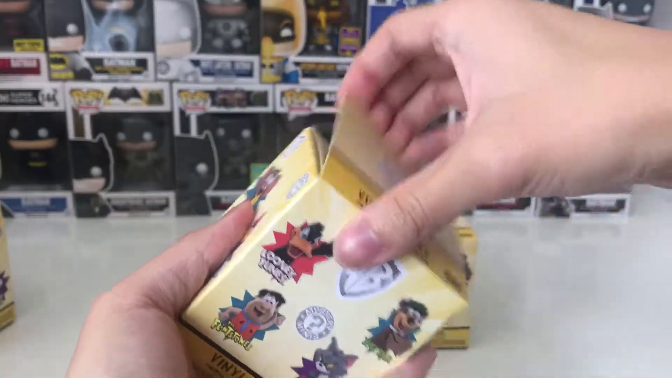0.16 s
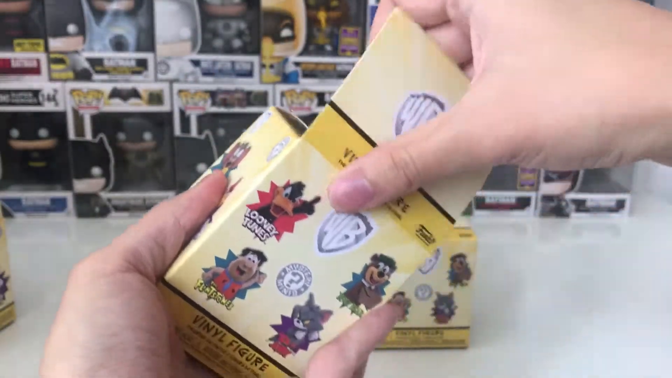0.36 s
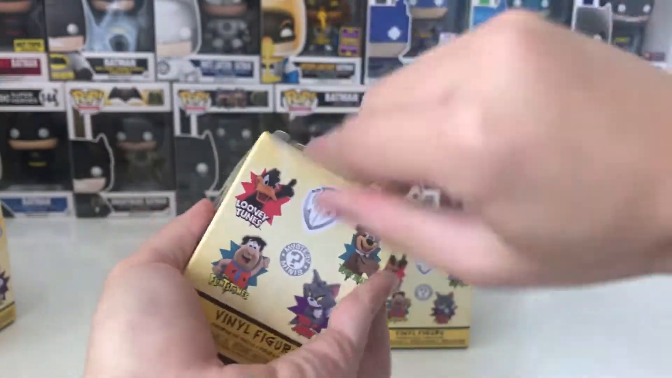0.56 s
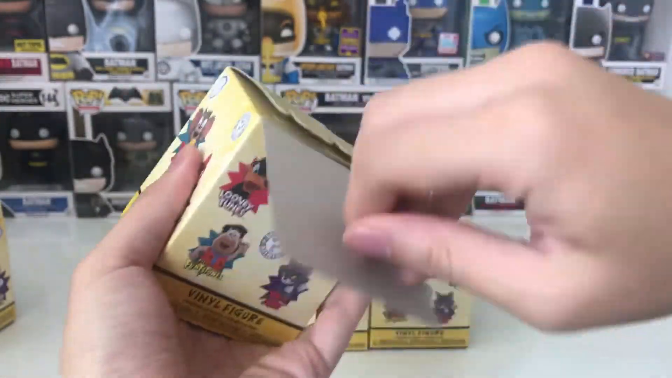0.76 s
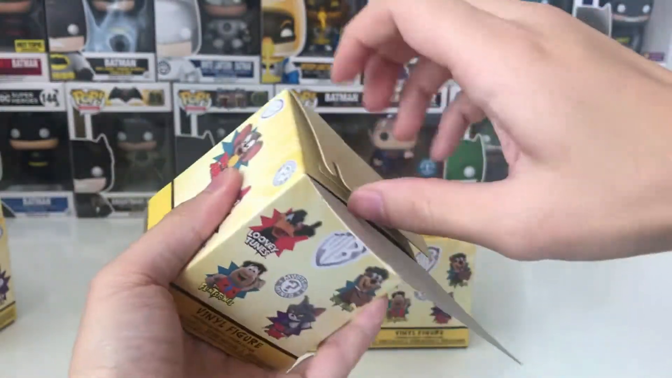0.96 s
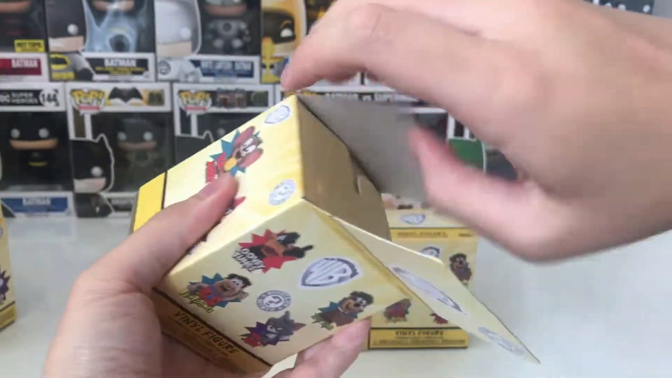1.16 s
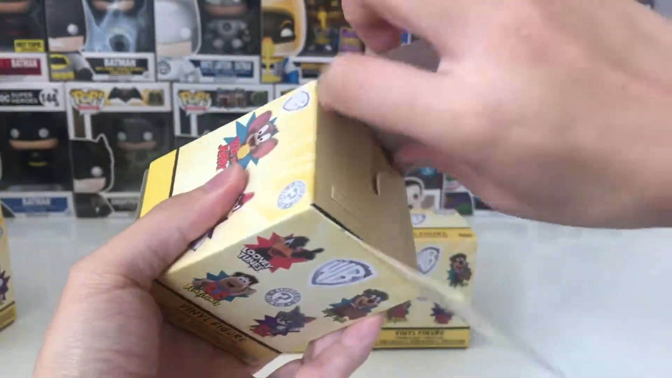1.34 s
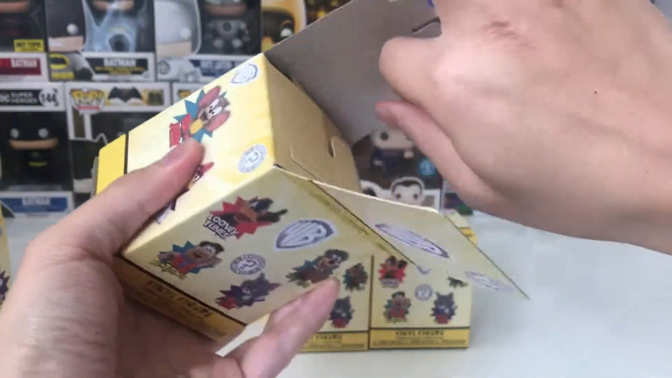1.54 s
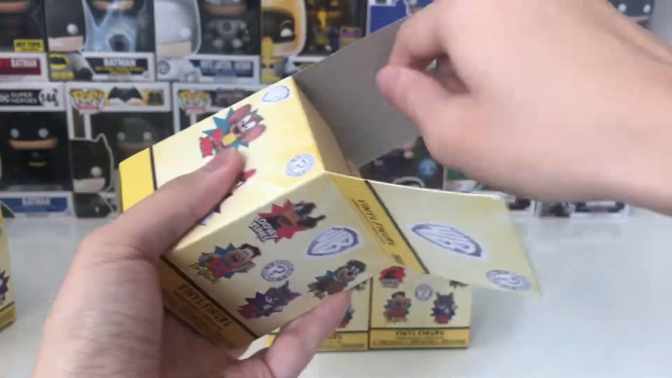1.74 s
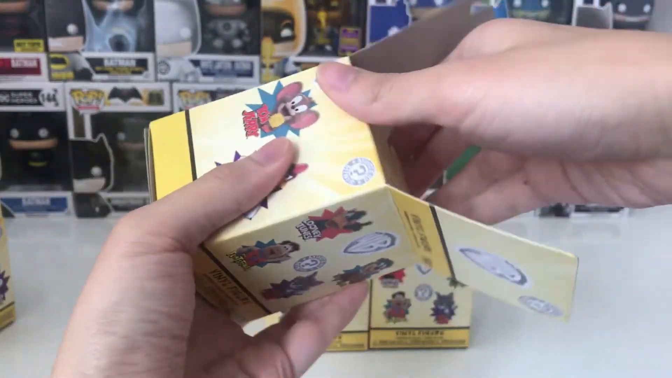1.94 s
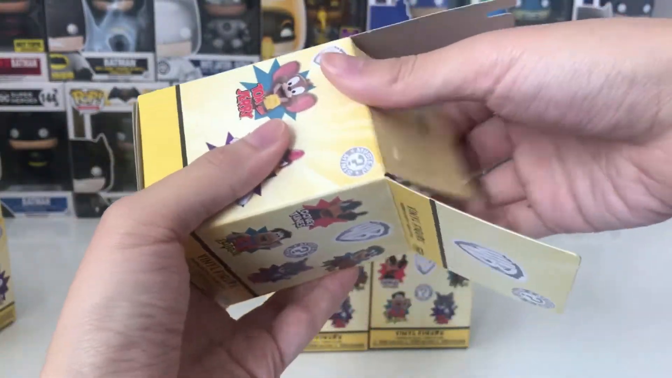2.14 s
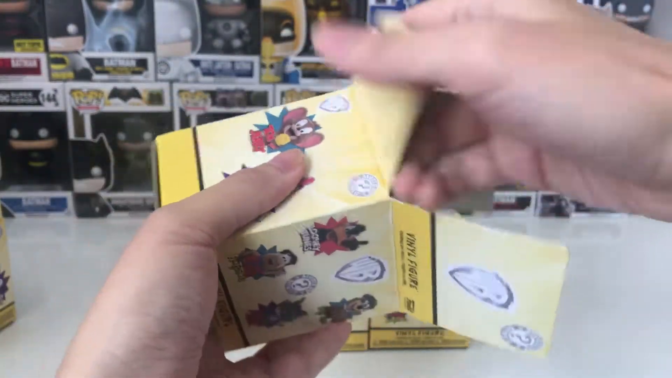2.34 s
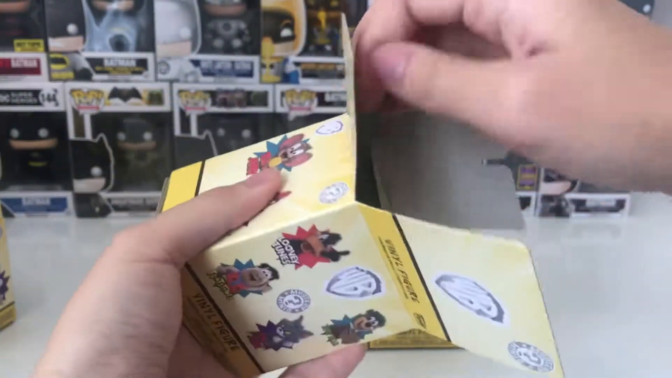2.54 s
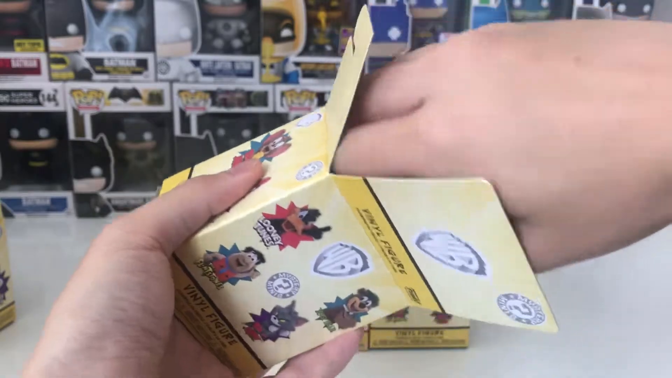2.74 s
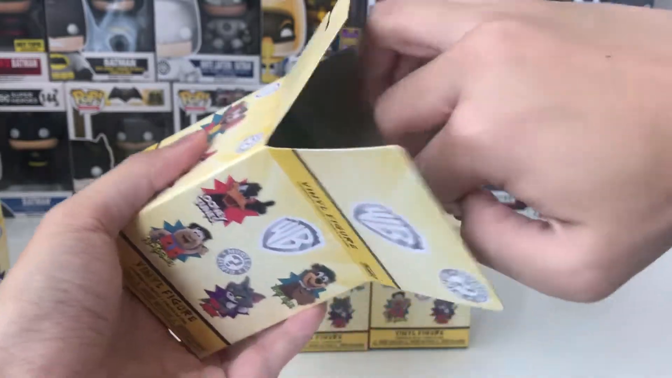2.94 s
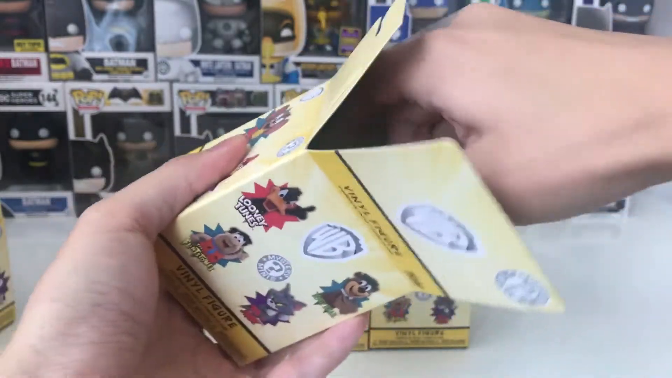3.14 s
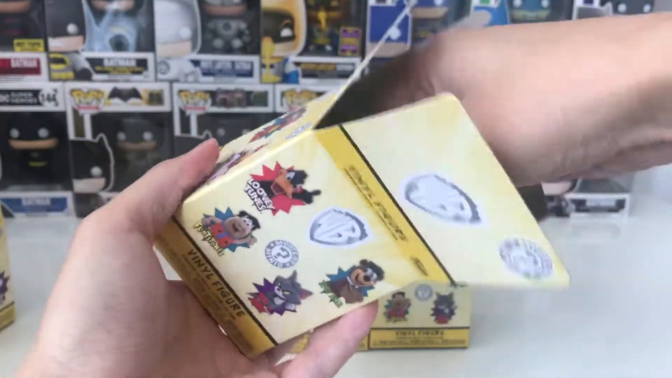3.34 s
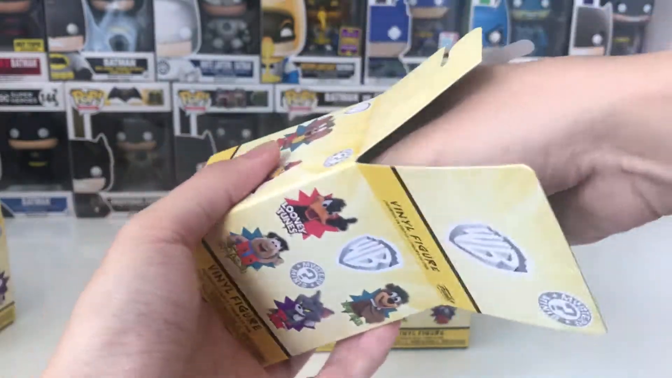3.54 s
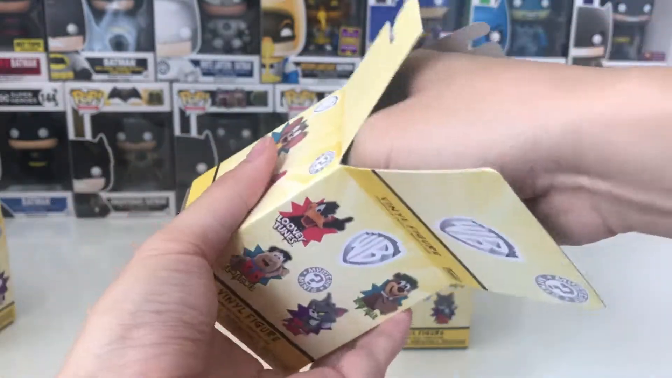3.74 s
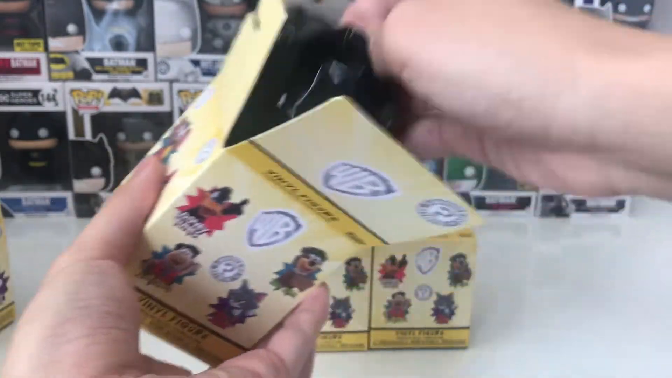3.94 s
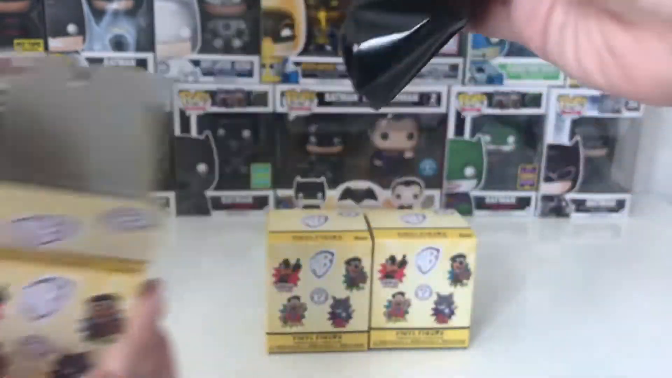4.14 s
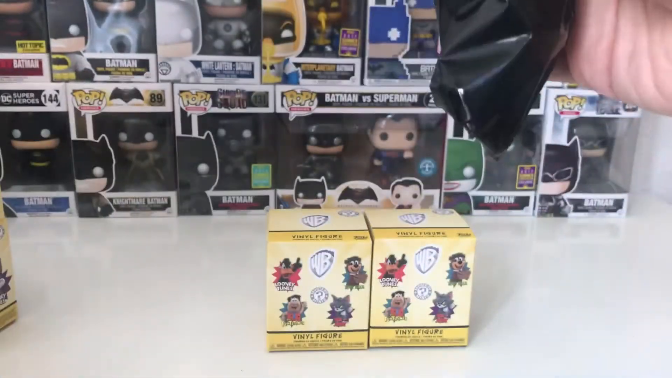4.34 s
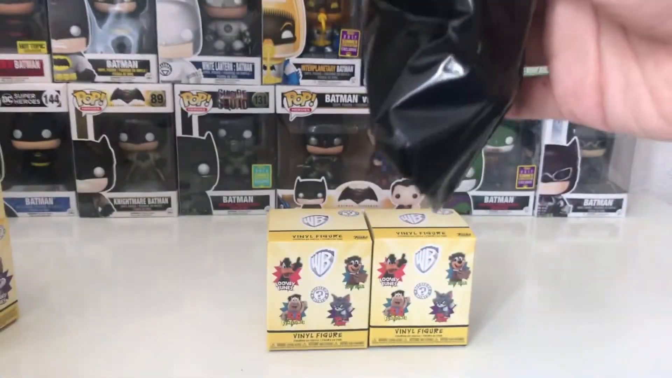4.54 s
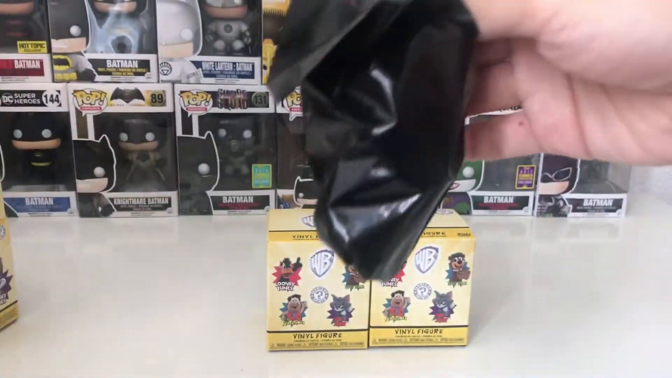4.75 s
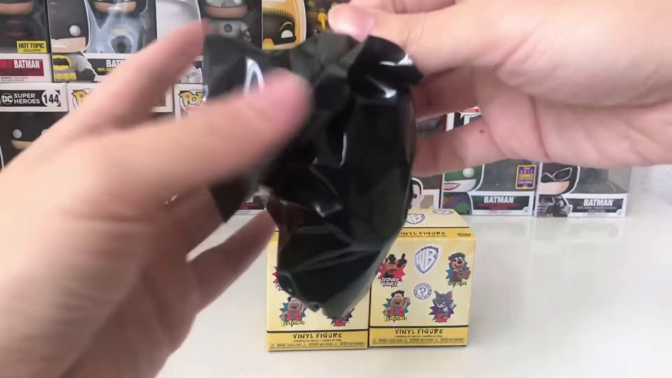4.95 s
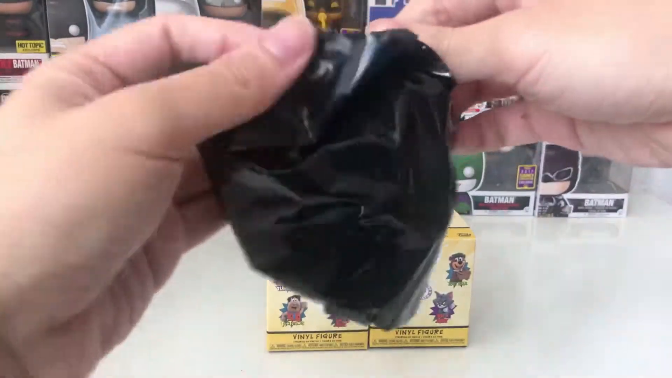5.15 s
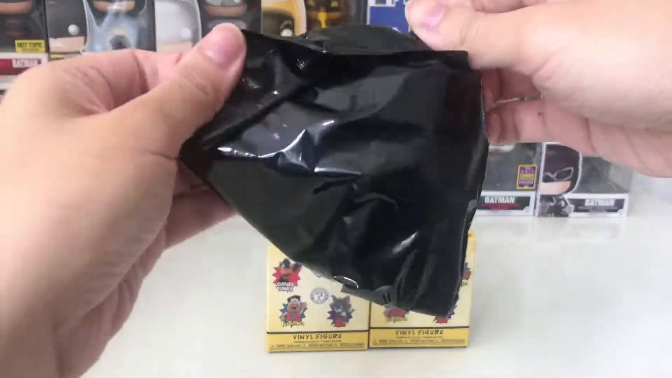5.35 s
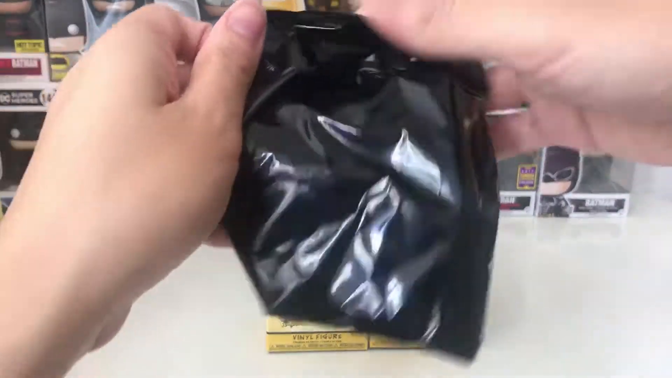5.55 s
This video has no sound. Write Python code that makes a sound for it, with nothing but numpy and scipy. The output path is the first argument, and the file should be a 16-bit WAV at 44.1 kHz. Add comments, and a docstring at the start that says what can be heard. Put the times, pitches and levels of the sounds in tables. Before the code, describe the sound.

In a quiet room with a faint hum, a small cardboard box cracks open at its glued lid. Flaps rasp and briefly squeak, and fingers slide over the card between light, hollow knocks. After a loud snap and a soft bump, a foil bag rustles and knocks its way out of the box, pauses, then crinkles steadily as it is handled. Everything is heard close to the microphone.

```python
"""A quiet, humming room, where two hands open a small cardboard box close to the microphone.
The glued lid snaps free; knocks crack at the edge, ring the panels and thud in the hollow of the box.
Fingers stick and slip on the card, and flaps scrape past each other with a pitched rasp and a squeak.
Then a foil bag comes out and crinkles in the hands: single creases pop over a shower of tiny ones."""
import sys
import numpy as np
from scipy import signal
from scipy.io import wavfile
from scipy.ndimage import uniform_filter1d

SR = 44100
rng = np.random.default_rng(int(sys.argv[2]) if len(sys.argv) > 2 else 0)


def put_to_file(sound):
    """Save the sound as 16-bit audio at rate SR, in the file named by the first command-line argument."""
    columns = np.atleast_2d(sound).T  # one column per channel
    safe = np.clip(columns, -1, 1)
    whole_steps = np.round(safe * 32767)
    wavfile.write(sys.argv[1], SR, whole_steps.astype(np.int16))


N = 251357
TIME = np.arange(N) / SR

# tone of friction on card: freq_hz, gain_db
CARD_HISS = [(700, -20.5), (1800, 1), (5500, 1), (9000, -4), (15500, -12.5)]


def gain_of(db):
    """Decibels to amplitude."""
    return 10 ** (np.asarray(db) / 20)


def unit_rms(x):
    """Scales to rms 1."""
    return x / np.sqrt(np.mean(x ** 2) + 1e-20)


def hit_level(x, db):
    """Gives a short sound the energy of 10 ms at the level db."""
    return gain_of(db) * x * np.sqrt(SR / 100 / np.sum(x ** 2))


def curve_at(points, hz):
    """Reads a curve on a log-frequency axis."""
    freqs, values = np.transpose(points)
    return np.interp(np.log(hz + 1), np.log(freqs + 1), values)


def add(mix, start_s, sound):
    """Mixes a sound in at start_s."""
    part = mix[round(start_s * SR):][:len(sound)]
    part += sound[:len(part)]


def colour(x, tone, hz=1000, focus_db=0, size=2048):
    """Minimum-phase EQ: the tone curve, less focus_db per octave either side of hz."""
    freqs = abs(np.fft.fftfreq(size, 1 / SR))
    octaves_off = abs(np.log2((freqs + 1) / hz))
    log_gain = np.log(gain_of(curve_at(tone, freqs) - focus_db * octaves_off))
    taps = np.fft.ifft(np.exp(np.conj(signal.hilbert(log_gain)))).real
    return signal.oaconvolve(x, taps[:size // 2])[:len(x)]


def resonate(x, hz, width_hz):
    """A steady or gliding resonance of gain 1."""
    carrier = np.exp(2j * np.pi * np.cumsum(hz * np.ones(len(x))) / SR)
    pole = np.exp(-np.pi * width_hz / SR)
    return 2 * (carrier * signal.lfilter([1 - pole], [1, -pole], x / carrier + 1e-18)).real


def burst(decay_s, sharpness=0, rise_s=1 / SR, size=4096):
    """A fast-dying run of fine slips; sharpness is the share of energy in the first jolt."""
    t = np.arange(size) / SR
    slipping = rng.choice([-1., 1.], size) * np.exp(-t / decay_s) * -np.expm1(-t / rise_s)
    jolt = np.sqrt(sharpness) * (t == 0)
    return jolt + np.sqrt(1 - sharpness) * slipping / np.linalg.norm(slipping)


def slips(per_s, spread_db):
    """A random train of tiny slips, mostly small, a few large."""
    strength = gain_of(spread_db * np.minimum(rng.exponential(1, N), 2))
    return unit_rms(strength * rng.choice([-1., 1.], N) * (rng.random(N) < per_s / SR))


def waver(depth_db, per_s):
    """A random factor around 1 that drifts per_s times a second."""
    return gain_of(depth_db * np.interp(TIME * per_s, np.arange(N), rng.standard_normal(N)))


def patchy(x, depth_db, size=7):
    """The contact wanders over the card, so patches of the spectrum swell and fade."""
    spectrum = signal.stft(x, nperseg=512)[2]
    patches = uniform_filter1d(rng.standard_normal(spectrum.shape), size, axis=0)
    patches = unit_rms(uniform_filter1d(patches, size, axis=1))
    return unit_rms(signal.istft(spectrum * gain_of(depth_db * patches))[1][:N])


def pressure(start_s, length_s, swell_share=0.17, release_db_per_s=278):
    """One stroke of the hand: it presses harder, holds and lets go."""
    t = TIME - start_s
    swell = np.clip(t / (swell_share * length_s), 0, 1)
    release_db = -release_db_per_s * np.maximum(t - length_s, 0)
    return swell * gain_of(np.maximum(release_db, -120))


def strokes(rows):
    """Overlapping strokes add in power; one envelope for each level column."""
    return np.sqrt(sum(np.outer(gain_of(levels_db), pressure(start_s, length_s)) ** 2
                       for start_s, length_s, *levels_db in rows))


def room_tone(hum_hz=50.5, hum_db=-57, air_db=-63, swell_s=0.14):
    """Faint room air and a wavering low hum that swells twice."""
    # tone of the air: freq_hz, gain_db
    air_tone = [(30, -2), (130, 0.5), (400, -5), (2200, -44.5), (15500, -50)]
    # swells of the hum: peak_s, level_db
    hum_swells = [(1.03, -50.5), (2.82, -49)]
    air = unit_rms(colour(rng.standard_normal(N), air_tone))
    drift = unit_rms(resonate(rng.standard_normal(N), hum_hz, width_hz=8))
    hum = unit_rms(np.sin(2 * np.pi * hum_hz * TIME) + drift / 4)
    swells = sum(gain_of(db) * np.exp(-((TIME - peak_s) / swell_s) ** 2) for peak_s, db in hum_swells)
    return gain_of(air_db) * air + (gain_of(hum_db) + swells) * hum


def panels(push, tuning, focus_db=0, width_hz=90):
    """The card panels ring, their modes scaled by tuning; focus_db favours the middle modes."""
    # panel modes before tuning: freq_hz, gain_db
    modes = [(570, -17.5), (695, 0.5), (915, 4), (1050, 3), (1240, -6.5), (1600, 0)]
    out = np.zeros(len(push))
    for hz, db in modes:
        ring = resonate(push, hz * tuning, width_hz)
        ring = resonate(ring, hz * tuning, hz * 1.6)  # a broad second pass trims the skirts
        out += gain_of(db - focus_db * abs(np.log2(hz / 1000))) * ring
    return out


def cavity(push):
    """The hollow low ring of the whole box and the air in it."""
    # low box modes: freq_hz, width_hz, gain_db
    modes = [(144.6, 154, -1.5), (292.6, 56, 1.5)]
    return sum(gain_of(db) * resonate(resonate(push, hz, width), hz, width) for hz, width, db in modes)


def knocks():
    """Each blow cracks at the edge, rings the panels at its own pitch and thuds inside the box."""
    # snaps and knocks on the card: start_s, crack_db, panel_db, thud_db, pitch_hz
    blows = [(0.1556, -30.5, -47, -52, 1050), (0.172, -19, -33, -74, 1220), (0.184, -20, -24, -45, 1140),
             (0.188, -29, -25.5, -35.5, 1020), (0.276, -45.5, -44, -39.5, 1030),
             (0.7719, -36, -33, -55, 1635), (0.818, -37.5, -32, -60, 1367), (1.205, -70, -45, -51.5, 830),
             (1.288, -55, -42.5, -41, 850), (1.459, -72, -44, -47, 580), (1.603, -55, -35.5, -39.5, 770),
             (1.884, -45, -42.5, -49, 794), (1.896, -45, -41.5, -56, 925), (1.938, -46.5, -44.5, -57, 860),
             (2.055, -54, -40.5, -68, 940), (2.159, -78, -40.5, -69, 553), (2.202, -49, -38.5, -43, 870),
             (2.378, -46.5, -38, -51, 980), (2.799, -47.5, -38.5, -42.5, 760),
             (2.896, -43.5, -47.5, -67, 870), (2.941, -19.5, -22, -29.5, 847),
             (2.953, -39, -28.5, -33, 1080), (3.382, -39.5, -32, -37, 706), (3.901, -30, -25.5, -35.5, 983),
             (3.912, -31, -29, -42, 1036), (3.968, -32, -37, -67, 1210), (3.985, -30, -30, -38, 1040),
             (4.031, -56, -31.5, -41, 923), (4.55, -45, -40.5, -35.5, 900)]
    # tone of a cracking edge: freq_hz, gain_db
    edge_tone = [(500, -6), (1800, 4.5), (2600, -6.5), (3600, -0.5), (4800, -12.5), (6000, -8), (9500, -11),
                 (15500, -9)]
    out = np.zeros(N)
    for start_s, crack_db, panel_db, thud_db, pitch_hz in blows:
        # near 1, glue breaks sharp and bright; near 0, a finger lands gradually
        brittle = 1 / (1 + gain_of(panel_db - crack_db))
        rise_s = 0.0014 * (1 - brittle) ** 2 + 1 / SR
        snap = burst(decay_s=0.0034, sharpness=brittle ** 2 / 2, rise_s=rise_s)
        crack = colour(snap, edge_tone, hz=2500 + 7000 * brittle, focus_db=9.5)
        ring = panels(burst(decay_s=0.0035, rise_s=rise_s), tuning=pitch_hz / 1000, focus_db=7)
        thud = cavity(burst(decay_s=0.0085, sharpness=0.5))
        knock = hit_level(crack, crack_db) + hit_level(ring, panel_db) + hit_level(thud, thud_db)
        add(out, start_s, knock)
    return out


def rubbing(hold_body_db=-68.5, hold_hiss_db=-66):
    """Stick and slip on the card: the contact hisses, the flexing panels and the air inside murmur."""
    # skin, bag or table sliding along the box: start_s, length_s, body_db, hiss_db
    rubs = [(0.18, 0.068, -65, -41), (0.21, 0.084, -48, -45.5), (0.26, 0.32, -58.5, -53),
            (0.548, 0.039, -53, -44.5), (0.93, 0.062, -50, -60.5), (1.19, 0.11, -61, -47),
            (1.342, 0.065, -44, -44.5), (1.44, 0.079, -63, -48), (1.59, 0.07, -52, -54.5),
            (1.71, 0.015, -55, -57.5), (1.78, 0.1, -84.5, -54), (2.02, 0.12, -57, -55.5),
            (2.18, 0.084, -58, -51), (2.26, 0.19, -47.5, -48), (2.52, 0.038, -49, -51.5),
            (2.55, 1, -56.5, -52.5), (2.94, 0.067, -39, -43.5), (3.165, 0.034, -45.5, -46),
            (3.36, 0.39, -51.5, -52), (3.77, 0.23, -45.5, -44), (3.955, 0.041, -48, -36.5),
            (4.02, 0.757, -67, -61.5), (4.508, 0.032, -47, -41.5), (4.55, 0.04, -41.5, -65),
            (4.82, 0.048, -60.5, -50.5)]
    holding = gain_of([[hold_body_db], [hold_hiss_db]])  # fingers that merely hold the card
    body_gain, hiss_gain = np.hypot(strokes(rubs), holding)
    friction = slips(per_s=480, spread_db=6) * waver(depth_db=2.5, per_s=60)
    bend = waver(depth_db=1.4, per_s=18)
    body = unit_rms(unit_rms(panels(friction, tuning=bend)) + gain_of(-8) * unit_rms(cavity(friction)))
    firm_hiss = patchy(colour(slips(per_s=6000, spread_db=4.5), CARD_HISS), depth_db=2.2, size=14)
    # a light touch leaves the panels still and hisses higher
    light_hiss = unit_rms(signal.lfilter([1, -1], [1, 0.4], firm_hiss))
    lightness = (hiss_gain / (hiss_gain + body_gain)) ** 2
    hiss = unit_rms((1 - lightness) * firm_hiss + lightness * light_hiss)
    return body_gain * body + hiss_gain * hiss * waver(depth_db=3, per_s=130)


def flap_scrape(ends_db=-20, drop_octaves=0.25, width_hz=700):
    """Fibres catch on a cut edge and sound the gap between flaps; each drag rises and falls in pitch."""
    # one flap dragged over another: start_s, length_s, level_db, pitch_hz
    drags = [(0.614, 0.1, -34.5, 1005), (0.75, 0.015, -23.5, 990), (0.783, 0.091, -43.5, 1060),
             (0.834, 0.12, -39.5, 1036)]
    # gap resonances at 1, 2, 3... times the pitch: gain_db
    gap_modes = [-1, 6, 7, 1, -18, -3.5, -28, -11.5]
    fibres = slips(per_s=5000, spread_db=3)
    gains, pitches = [], []
    for start_s, length_s, level_db, pitch_hz in drags:
        progress = np.clip((TIME - start_s) / length_s, -1, 2)
        slowness = (2 * progress - 1) ** 2  # 0 in mid drag, 1 at its ends
        gains.append(gain_of(level_db + ends_db * slowness))
        pitches.append(pitch_hz / 2 ** (drop_octaves * np.minimum(slowness, 2)))
    pitch = np.average(pitches, axis=0, weights=gains) * waver(depth_db=0.6, per_s=110)
    gap = sum(gain_of(db) * resonate(resonate(fibres, k * pitch, width_hz), k * pitch, width_hz)
              for k, db in enumerate(gap_modes, 1))
    rasp = unit_rms(gap) + gain_of(-5.5) * unit_rms(colour(fibres, CARD_HISS))
    return sum(gains) * patchy(rasp, depth_db=2) * waver(depth_db=1.5, per_s=220)


def tab_squeak(swell_s=0.0044):
    """The tab sticks and slips in quick, uneven jerks as it clears the edge."""
    # the squeak: peak_s, level_db, pitch_hz
    chirp = (0.759, -28.5, 3600)
    peak_s, level_db, pitch_hz = chirp
    cycles = np.cumsum(pitch_hz * waver(depth_db=0.6, per_s=1500)) / SR
    jerks = sum(np.cos(2 * np.pi * k * cycles) / np.sqrt(k) for k in range(1, 5))
    return hit_level(jerks * np.exp(-((TIME - peak_s) / swell_s) ** 2), level_db)


def crease(hz, focus_db):
    """One facet of foil snaps through with a tick, settles with a weaker one and rings very briefly."""
    # tone of a foil tick: freq_hz, gain_db
    foil_tone = [(400, 1), (1100, 6), (2300, 0), (3400, 3), (4800, 0.5), (7500, 0), (15500, -3.5)]
    snap = burst(decay_s=0.0011, sharpness=0.3, size=1024)
    settle = np.roll(snap, round(SR * rng.uniform(0.001, 0.004))) / 4
    tick = colour(snap + settle, foil_tone, hz, focus_db)
    return unit_rms(tick) + unit_rms(resonate(tick, hz, hz / 2)) / 2


def foil_bag(facet_count=20):
    """Large creases pop over a shower of small ones, denser under a harder grip, as the sheet flexes."""
    # fingers grip and bend the bag: start_s, length_s, level_db
    grips = [(3.47, 0.25, -46), (3.8, 0.25, -40), (4.96, 0.83, -43), (5.15, 0.016, -36.5),
             (5.235, 0.083, -36.5)]
    # large creases popping over: start_s, level_db, pitch_hz
    pops = [(3.2066, -37, 6860), (3.2138, -37.5, 6240), (3.2854, -33.5, 3660), (3.404, -36, 7850),
            (3.41, -37.5, 7900), (3.485, -35, 7160), (3.512, -35, 1700), (3.533, -39, 3760),
            (3.5693, -31, 1560), (3.604, -35, 9250), (3.6391, -36, 5500), (3.6589, -37, 3440),
            (3.669, -35, 5050), (3.7092, -37.5, 3900), (3.8019, -35, 6650), (3.832, -44, 6960),
            (4.0008, -27.5, 4940), (4.02, -29, 5700), (4.1188, -40.5, 4180), (4.148, -35.5, 2360),
            (4.1511, -30.5, 5400), (4.2813, -39, 8300), (4.648, -36, 3200), (4.8269, -46, 1900),
            (4.961, -49.5, 14100), (4.9905, -34, 3200), (5.047, -27, 11700), (5.0824, -41, 2520),
            (5.11, -32, 2820), (5.1444, -34, 3950), (5.1671, -37.5, 2880), (5.1794, -29.5, 3330),
            (5.2021, -55, 3000), (5.2199, -31.5, 8800), (5.2483, -32, 3450), (5.276, -32.5, 3400),
            (5.3157, -41, 8900), (5.3415, -33.5, 3180), (5.3627, -36.5, 2800), (5.3991, -40, 2830),
            (5.4206, -29, 3240), (5.449, -37, 5300), (5.457, -34, 8500), (5.492, -27.5, 3260),
            (5.581, -36, 9500), (5.6583, -33.5, 5500), (5.6711, -34.5, 6740)]
    grip = strokes(grips)[0]
    ticks_per_s = 170 + 34000 * grip
    ticks = unit_rms(slips(per_s=ticks_per_s, spread_db=6.5) / np.sqrt(ticks_per_s))
    facet = rng.integers(0, facet_count, N)  # each tick lands on one facet, with its own pitch
    shower = sum(signal.oaconvolve(ticks * (facet == k), hit_level(crease(hz, focus_db=5.5), 0))[:N]
                 for k, hz in enumerate(np.geomspace(1550, 11000, facet_count)))
    flex = gain_of(-8) * unit_rms(resonate(ticks, hz=280, width_hz=380))
    out = grip * (unit_rms(shower) + flex)
    for start_s, level_db, pitch_hz in pops:
        add(out, start_s, hit_level(crease(pitch_hz, focus_db=3), level_db))
    return out


def finger_bump(swell_s=0.0024):
    """A fingertip bumps the floor of the box: a soft push, too damped to ring."""
    # the bump: peak_s, level_db, pitch_hz
    push = (3.3858, -24, 245)
    peak_s, level_db, pitch_hz = push
    t = TIME - peak_s
    return hit_level(np.sin(2 * np.pi * pitch_hz * t) * np.exp(-(t / swell_s) ** 2), level_db)


def room(x, tail_db=-15.5, predelay_s=0.005, echo_s=0.0095, echo_db=-21):
    """A near surface throws back one echo; the walls add a short tail that dulls as it dies."""
    # decay of the room: freq_hz, t60_s
    decay_times = [(200, 0.58), (6000, 0.15), (15000, 0.11)]
    hz, t, noise = signal.stft(rng.standard_normal(SR // 2), SR, nperseg=256)
    fade = gain_of(-60 * t / curve_at(decay_times, hz)[:, None])
    tail = signal.istft(noise * fade, SR, nperseg=256)[1]
    response = np.zeros(SR)
    add(response, predelay_s, gain_of(tail_db) * tail / np.linalg.norm(tail))
    add(response, echo_s, gain_of([echo_db]))
    return x + signal.fftconvolve(x, response)[:N]


def scene():
    """Mono mix: box and bag sound in the room; the bump and the room tone stay dry."""
    box = room(knocks() + rubbing() + flap_scrape() + tab_squeak())
    bag = room(foil_bag())
    return (box + bag + finger_bump() + room_tone())[None]


def record(dry, cutoff_hz=16100):
    """A steep low-pass takes off the very top of the treble."""
    lowpass = signal.firwin(401, cutoff_hz, window=("kaiser", 8), fs=SR)
    return signal.oaconvolve(dry, lowpass[None], "same")


dry = scene()
out = record(dry)
put_to_file(out)
```